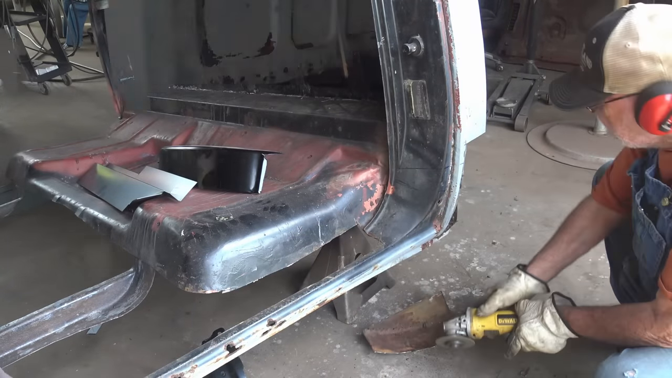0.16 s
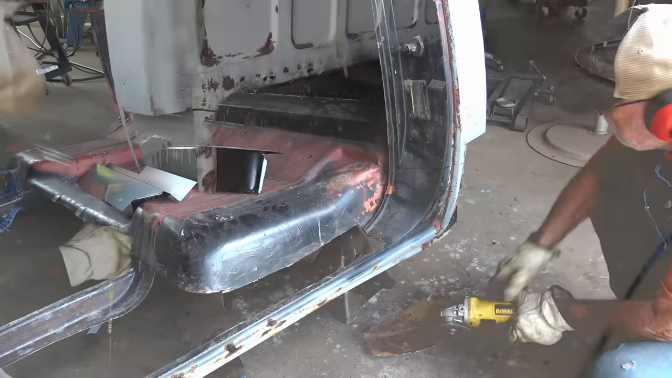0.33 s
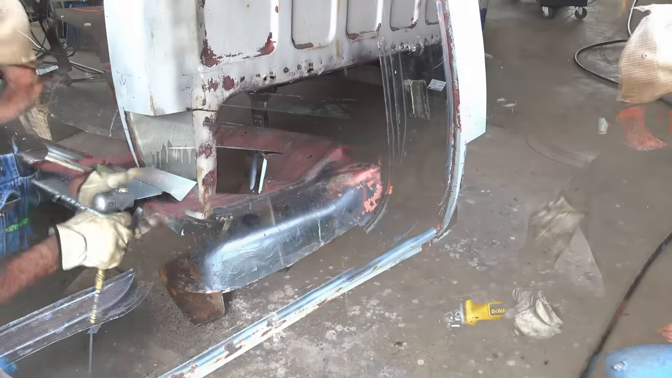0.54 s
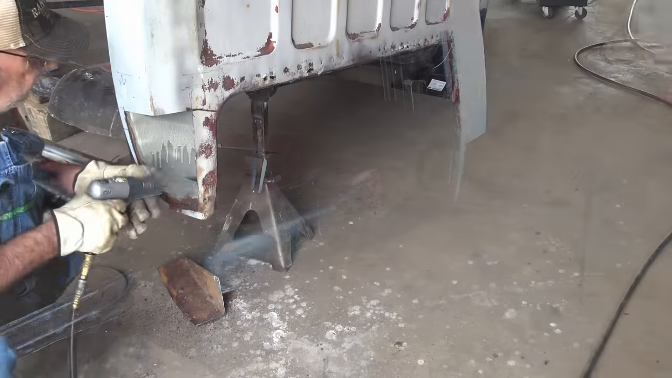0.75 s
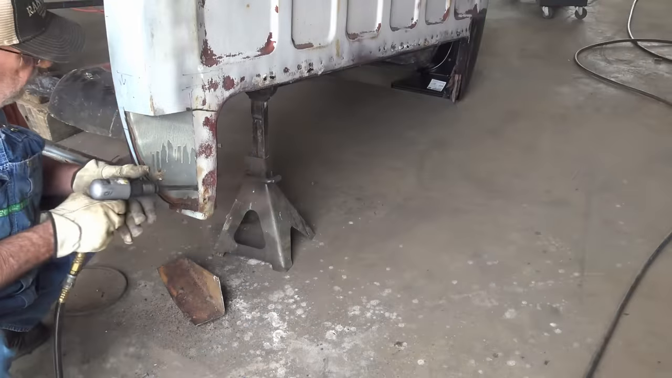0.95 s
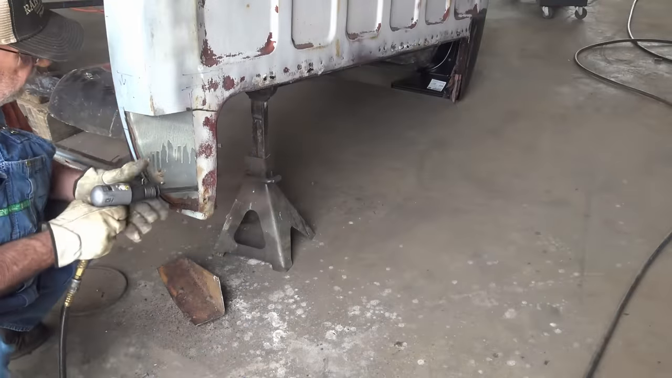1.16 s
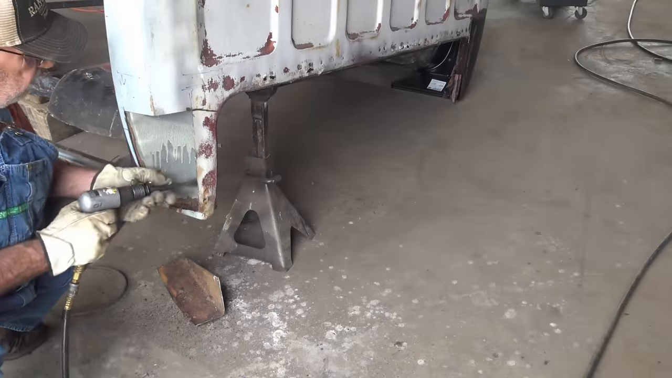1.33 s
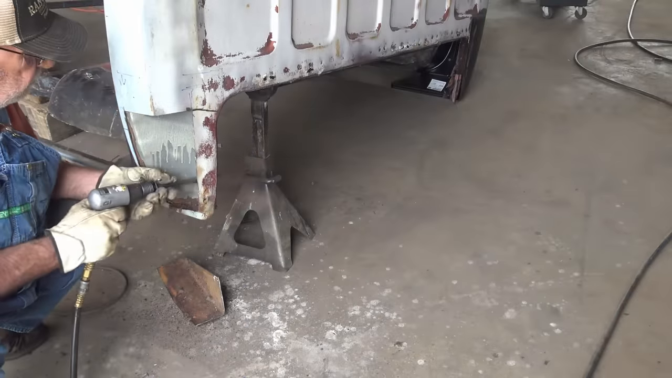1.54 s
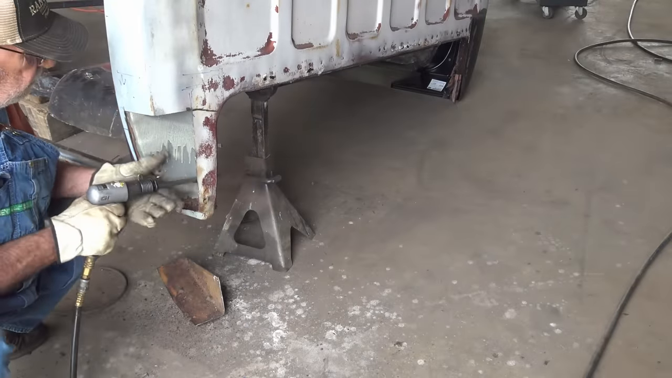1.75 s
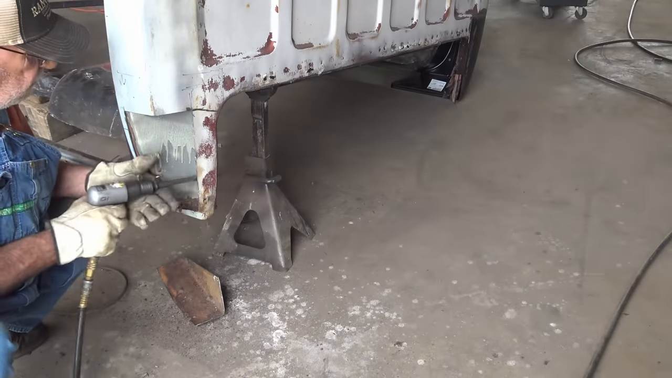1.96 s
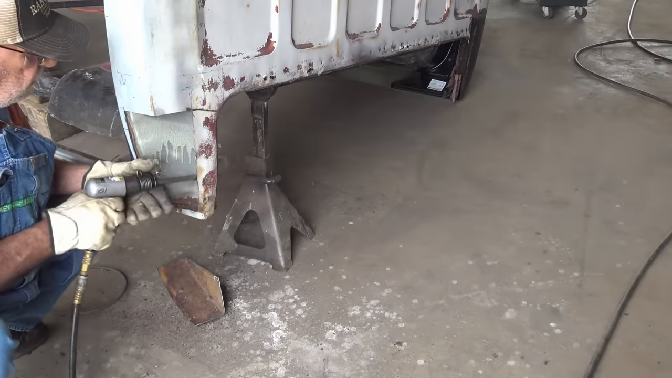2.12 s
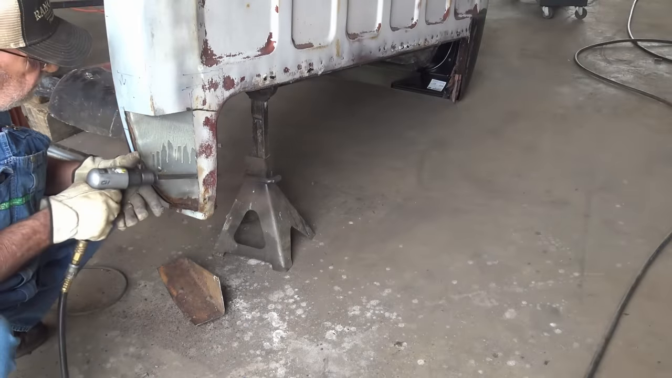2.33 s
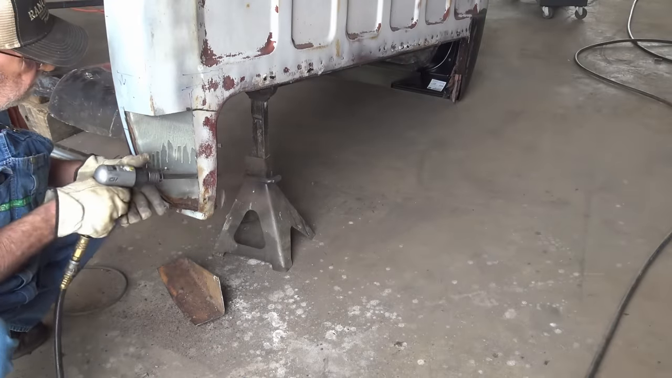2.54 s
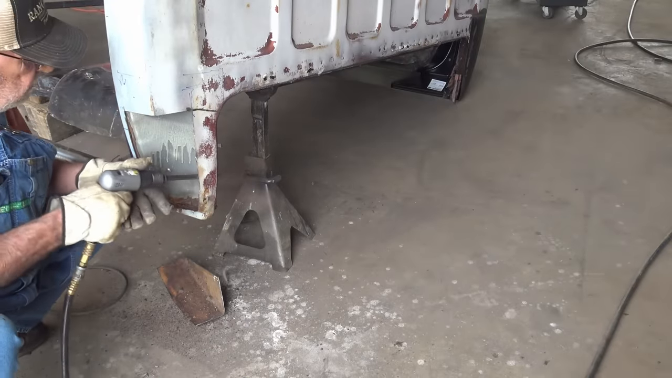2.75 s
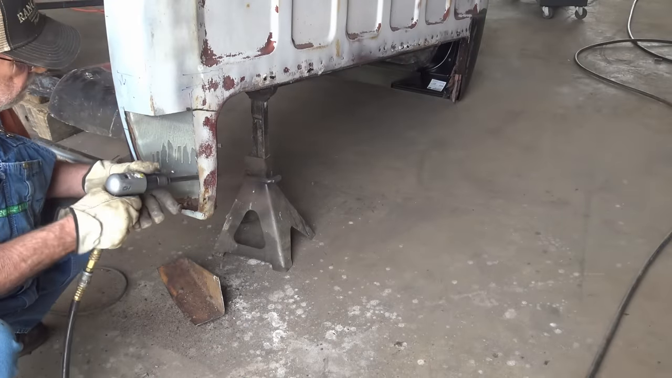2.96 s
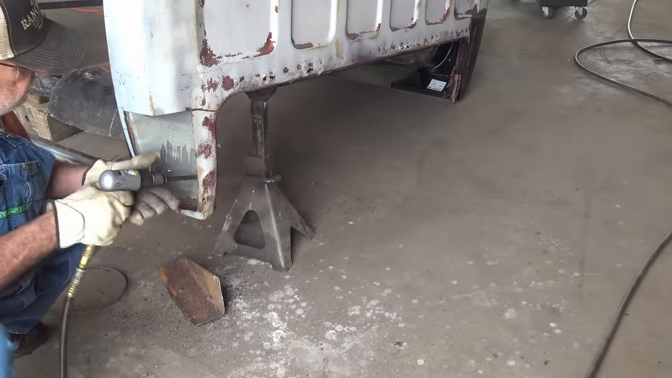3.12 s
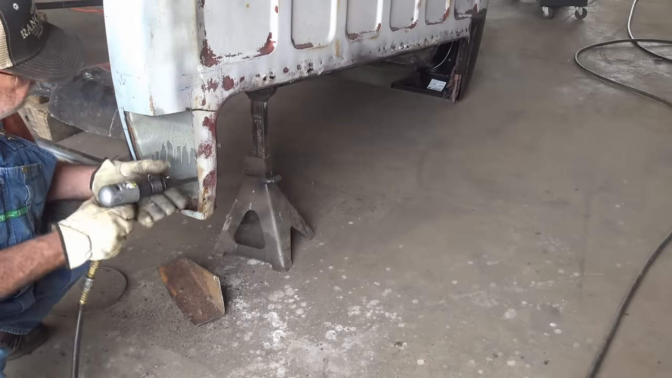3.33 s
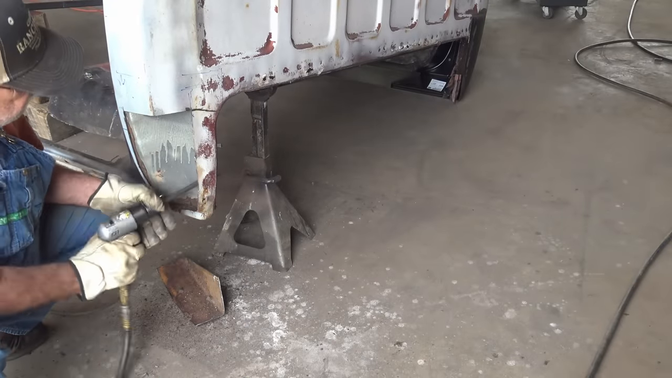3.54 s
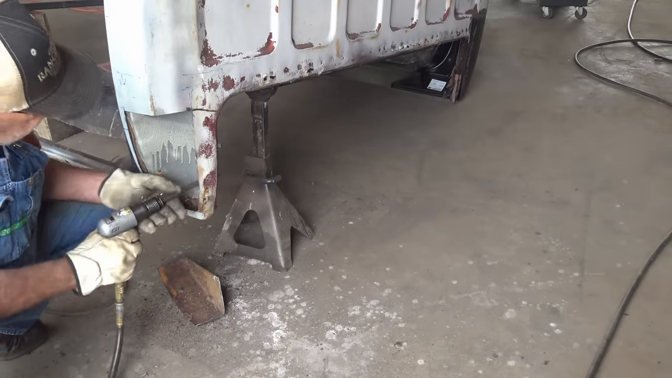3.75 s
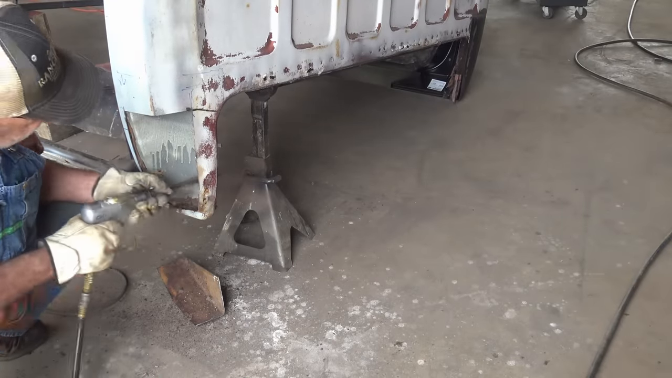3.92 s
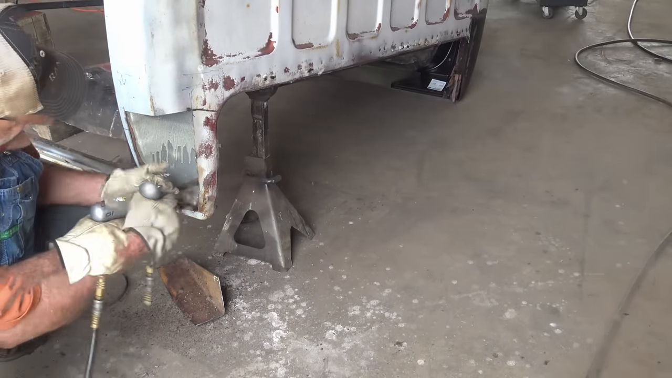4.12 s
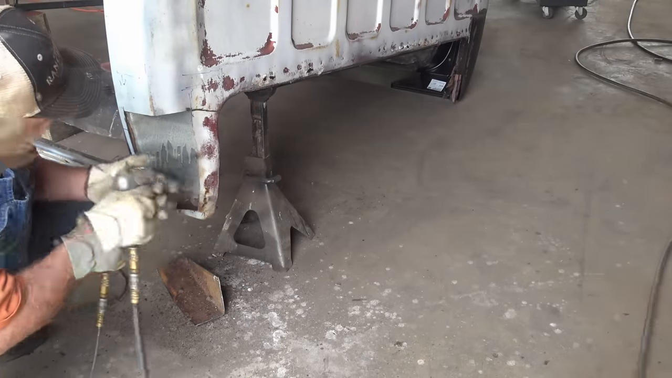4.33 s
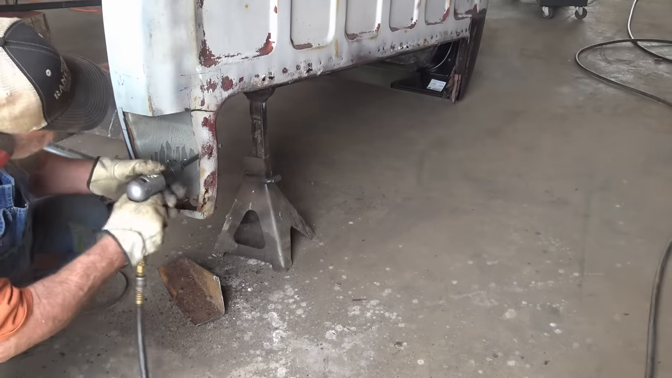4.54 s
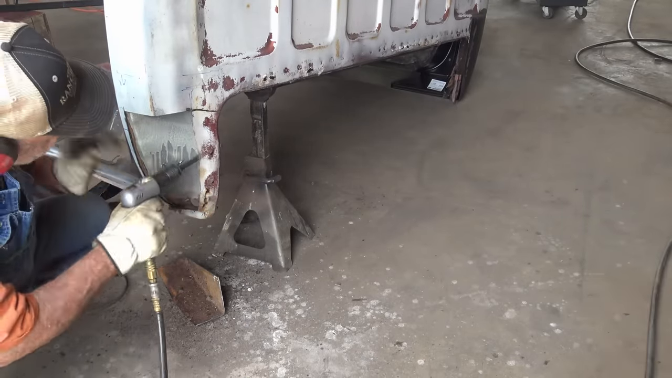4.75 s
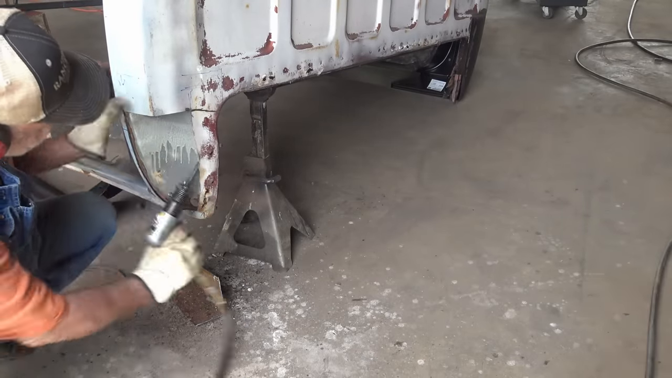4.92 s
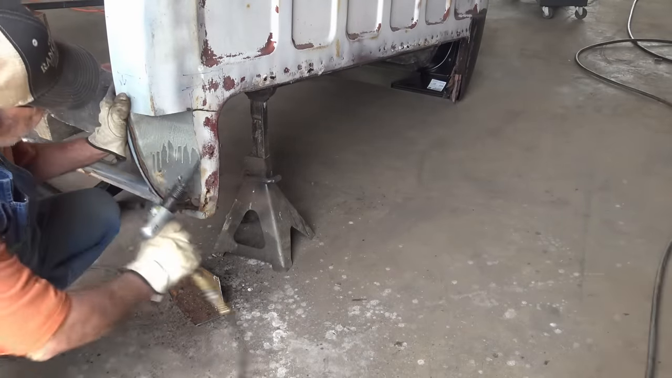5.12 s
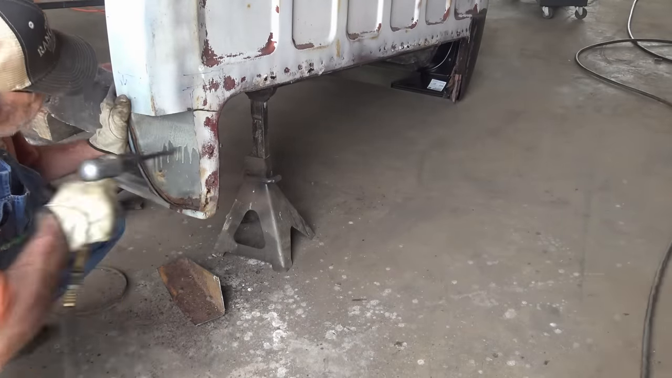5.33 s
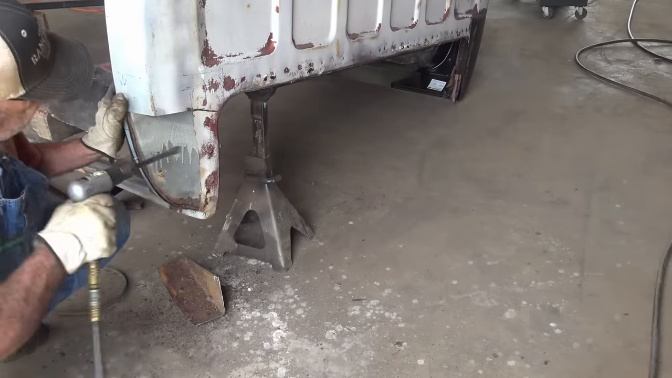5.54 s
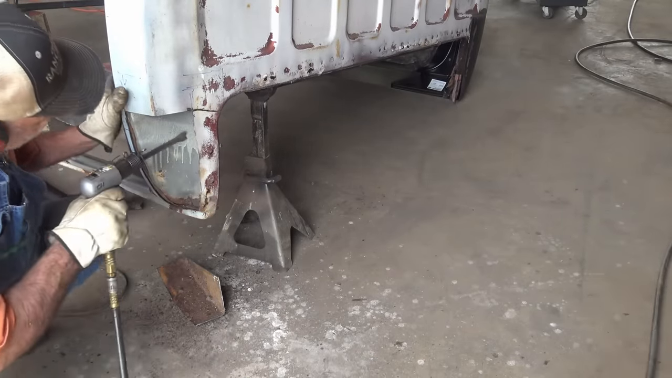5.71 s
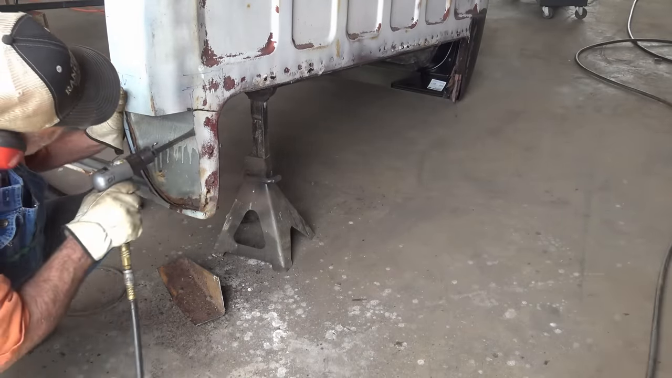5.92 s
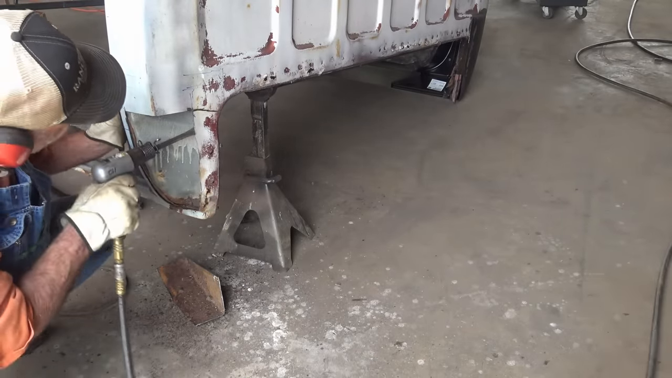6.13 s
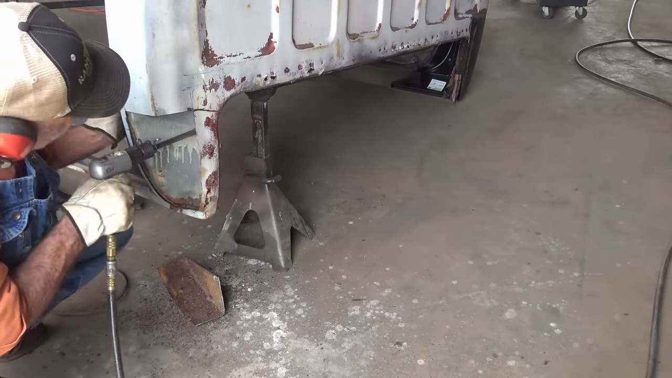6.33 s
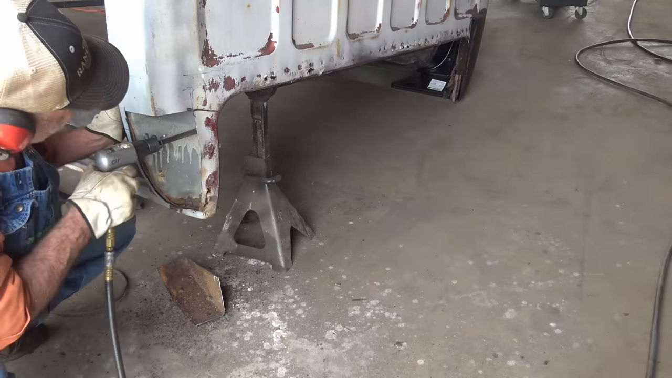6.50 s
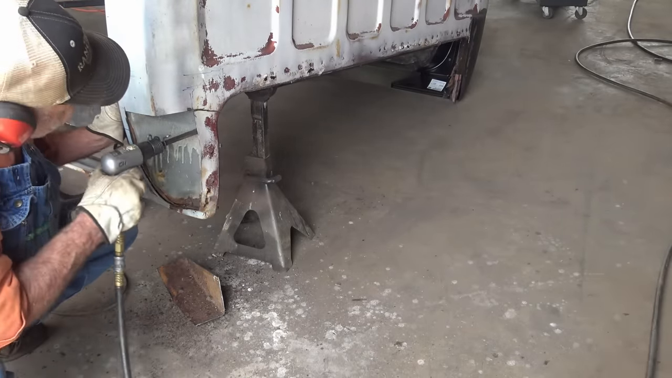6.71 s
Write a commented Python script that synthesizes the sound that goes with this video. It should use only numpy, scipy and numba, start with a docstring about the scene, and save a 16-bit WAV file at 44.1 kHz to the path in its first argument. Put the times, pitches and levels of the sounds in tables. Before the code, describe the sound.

Close up in a workshop, a faint grinder runs down with a soft wooden bump, then compressed air spurts and a pneumatic chisel fires rapid bursts of hard metallic blows, each leaving a hollow panel boom and short hall tail. Four come early; then the room quiets to hum, thin hiss and scattered light knocks on metal. A fifth burst, slightly softer, rattles near the end and decays.

```python
"""An air chisel hammers five bursts into a sheet-metal body, close to a stereo pair of microphones in a workshop.
Each blow is a noise crack on decaying modes of panel, bit, tip and barrel, with a puff of exhaust and a hall tail.
Before it a grinder (falling sines over noise) runs down and fades; bumps of the tool ring the hand-damped panel.
Behind lie leaking air and a compressor's hum, made of coloured noise and steady tones.
The recorder's limiter holds the bursts down, so the boom swells up again when the blows stop."""
import sys
import numpy as np
from scipy import signal
from scipy.fft import rfft, irfft
from scipy.io import wavfile
from scipy.ndimage import uniform_filter1d, minimum_filter1d
from numba import njit

SR = 44100
rng = np.random.default_rng(int(sys.argv[2]) if len(sys.argv) > 2 else 0)


def int16_out(signal):
    """Quantize to a 16-bit WAV file."""
    q = np.round(np.clip(np.atleast_2d(signal).T, -1, 1) * 32767)
    wavfile.write(sys.argv[1], SR, q.astype(np.int16))


def convert_level_to_amplitude(level_db):
    """Map a level in decibels to its linear amplitude factor."""
    exponent = np.asarray(level_db, float) / 20
    return 10 ** exponent


N = 302967
T = np.arange(N) / SR

# Shop air: spectrum of the leak, before scaling to rms 1: (frequency [Hz], density [dB per Hz])
HISS_SPECTRUM = [(290, -10.5), (500, -6.5), (619, -3), (829, -3), (922, -9), (1220, -4), (1870, -3.5),
                 (3930, 0.5), (4920, -2), (6600, -0.5), (10500, -1), (13000, -4), (15600, -8.5)]
# level of the leaking air: (time [s], level [dB])
LEAK_LEVEL = [(.574, -32.5), (.81, -35), (1.36, -46), (1.546, -41.5), (1.8, -42), (2.24, -50.5),
              (3.42, -52.5), (3.534, -50), (4.24, -49.5), (4.25, -55), (4.71, -55.5), (4.8, -51),
              (4.98, -46), (5.06, -50.5), (5.27, -52), (5.31, -46), (6.3, -40.5), (6.8, -54)]
# valve opening ahead of a burst, and loose spurts of air: (time [s], peak level [dB], length [s])
AIR_SPURTS = [(0.807, -10, 0.044), (1.805, -18, 0.013), (2.276, -31.5, 0.0096), (2.686, -30, 0.018),
              (6.309, -18, 0.018), (4.915, -44.5, 0.018), (4.982, -41.5, 0.039)]
# spectrum of the shop's hum, before scaling to rms 1: (frequency [Hz], density [dB per Hz])
HUM_SPECTRUM = [(15, -35), (25, -29), (48, -9.5), (95, -6), (140, 1), (190, 1.5), (260, -4), (330, -3.5),
                (395, -7.5), (425, 0.5), (470, -7), (650, -12), (1500, -15), (2500, -68)]
# level of the hum with its tones: (time [s], level [dB])
HUM_LEVEL = [(.57, -61.5), (1.7, -58), (3.3, -55.5), (3.6, -56), (4.24, -53.5), (4.25, -60), (5.25, -56.5),
             (5.4, -56), (6.3, -53.5), (6.8, -59)]
# compressor tones: (multiple of the turning rate, level against the hum [dB])
COMPRESSOR_TONES = [(2, -16), (6, -10), (7, -10), (8, -10), (9, -16), (12, -14), (13, -9), (15, -15),
                    (17, -9), (20, -16), (21, -16)]
COMPRESSOR_HZ = 23.13  # turning rate

# Grinder: spectrum of its motor noise, before scaling to rms 1: (frequency [Hz], density [dB per Hz])
GRINDER_SPECTRUM = [(40, -38), (100, -20), (300, -20), (450, -16), (540, -13), (640, -11.5), (950, -12),
                    (1280, -2), (1900, -6.5), (2900, -1.5), (5000, -9), (9000, -10.5), (15500, -25)]
# grinder laid on a block: (time [s], level [dB])
SET_DOWN = [(.012, -63), (.06, -55.5)]
# modes of the wooden block: (frequency [Hz], level [dB], t60 [s])
BLOCK_MODES = [(179, -11, .25), (455, -3, 0.29), (615, -3, 0.48), (722, -0.5, 0.31)]
WHINE_HZ, RUNDOWN_PER_S, FADE_END_S = 9330, .4, .57  # whine at the start, its rate of fall
WHINE_DB, MOTOR_DB = -59, -50.5
WHINE_PER_SHAFT, SHAFT_DB = 24.5, -17  # whine over shaft rate; shaft hum against the whine
GRINDER_SIDE_DB = -2  # the grinder is narrower
SCRAPE_S = .05  # it slides a moment on the wood

# Tool bumping the body: (time [s], level [dB], hardness [dB per octave], modes favoured by the spot [Hz])
KNOCKS = [(1.46, -54.5, -7.5, 278.2), (1.545, -52.5, -4, 474), (1.6, -52.5, 0, 400),
          (4.077, -57.5, 6, 1010), (4.088, -61.5, 9, 1240), (4.161, -53, 1, 560), (4.163, -51, 6, 1300),
          (4.171, -52, 0, 860), (4.187, -55, 2, 398), (4.206, -67, 8, 495), (4.215, -57.5, 1, 280),
          (4.221, -60, 2, 900), (4.234, -61, 3, 1300), (4.572, -58, 4.5, 352), (4.588, -61.5, 3, 300),
          (5.304, -56, 11, 1345), (5.322, -58, 3, 556), (5.35, -59.5, 11, 920), (5.375, -56, 12, 500),
          (5.397, -57.5, 9, 420), (5.44, -64, -5, 400), (5.729, -54.5, 9, 450), (5.731, -53.5, 11, 1345),
          (5.75, -61, 11, 2280), (5.762, -63, 10, 990), (5.785, -60, 3, 1300), (6.314, -37, 8, 1800)]
# crack of a bump: (frequency [Hz], gain [dB])
KNOCK_CRACK = [(150, -24), (400, -5), (1200, -2), (2500, 4), (5000, 5), (12000, -9)]
HELD = 0.59  # share of its ring time that the panel keeps under the hand
KNOCK_SPOT_DB, KNOCK_SPOT_OCTAVES = 11, 0.17  # lift and width of the favoured modes
CUT_S = 4.243  # a cut here chops off the stand's direct ring and the tails of the earlier knocks

# Trigger pulls: (first blow [s], last blow [s], force [dB], freedom of the bit to ring [dB],
# force lost by the end [dB], modes favoured by the spot struck [Hz], stand level [dB], hardness [dB per octave])
BURSTS = [(0.8227, .962, -3.5, 18.5, 10, 266, -10, 2), (1.8151, 1.997, -4, 21, 18, 640, -5, 1),
          (2.2857, 2.475, -8.5, 8, 5.5, 464, 5, 2.5), (2.6976, 3.0193, -9.5, 7, 9.5, 605, -3.5, 2),
          (6.323, 6.524, -18, 17.5, 2, 436.6, -6, 3)]
# strokes that miss the bit and clack on the barrel: (time [s], clack level [dB])
CLACKS = [(0.8807, -3), (0.904, 6), (1.9147, 4), (1.982, -18), (1.992, -9), (2.3301, 4), (2.341, 0),
          (2.3499, 7), (2.3909, 5), (2.4173, -2), (2.457, -11), (2.7683, -4), (2.808, 6), (2.8336, -3),
          (2.859, 0), (2.8835, -5), (2.9086, -1), (2.9313, 2), (2.9406, 6), (2.9624, -3), (2.9883, 3),
          (3.0021, -20), (6.3139, 9), (6.4079, 5), (6.446, -3), (6.4711, 6), (6.496, 1.5)]
STROKE_S, REBOUND_S, JITTER_S = .0143, .0106, .0005  # piston cycle after a blow on the bit, after a clack
HIT_CLACK_DB, HIT_TICK_DB = -13, 5  # barrel and tip on a blow that meets the bit
MISS_TICK_DB, MISS_RING_DB = -21, -4  # tip and bit on a miss
SOFTENS_DB = 3  # per octave: contact hardness lost by the last blow as the bit sinks in
FIRST_BOOM_DB, FIRST_PUFF_DB = 4, 5  # first blow: panel at rest, exhaust vents full line pressure
# modes of the sheet-metal panel: (frequency [Hz], level [dB], t60 [s])
PANEL_MODES = [(124.3, -14.5, 2.3), (147.7, 3.5, 0.63), (166.1, -13, 1.36), (211.3, 1, 0.31),
               (256.8, -2.5, 0.4), (275.6, -0.5, 0.27), (354, 0, 0.39), (428, 7, 0.088), (432.4, 3.5, 0.13),
               (461, 3, 0.057), (550, 1.5, 0.065), (572.2, -7, 0.42), (620, 2.5, 0.076), (709, -6, 0.23),
               (845, -4.5, 0.12), (996, -2.5, 0.043), (1240, -6.5, 0.024), (1345, -14.5, 0.076),
               (1497, -4.5, 0.012), (1800, -7, 0.023), (2190, -19, 0.024), (2360, -20.5, 0.054),
               (2570, -16, 0.027)]
# modes of the steel bit: (frequency [Hz], level [dB], t60 [s])
BIT_MODES = [(4430, -22, .015), (7800, -14, .025), (8320, -13, .02), (12100, -15, .02), (13400, -11, .02),
             (14230, -6, .01), (14550, -3, .008), (14780, -1.5, .014), (15020, -2, .012), (15400, -3, .006)]
# modes of the bit's tip: (frequency [Hz], level [dB], t60 [s])
TIP_MODES = [(15100, 3, .004), (13800, -3, .003), (11000, -8, .002)]
# modes of the tool's barrel: (frequency [Hz], level [dB], t60 [s])
BARREL_MODES = [(8860, 3, .005), (9300, -1, .004), (7500, -6, .003)]
# steel stand, left ringing as each burst ends: (frequency [Hz], level [dB], t60 [s])
STAND_MODES = [(704.5, -48, 2.6), (708.5, -52, 2.6), (714, -54, 1.2)]
# crack of a blow: (frequency [Hz], gain [dB])
BLOW_CRACK = [(70, -49), (120, -11.5), (200, 10), (400, 13), (800, 7), (1600, 3.5), (3500, 1.5), (6000, -5),
              (9000, -10), (12000, -2.5), (15500, 2.5)]
# puff of exhaust after a blow: (frequency [Hz], gain [dB])
EXHAUST = [(1500, -8.5), (3500, 9), (7000, 15.5), (11000, 14), (15600, -23)]
PANEL_DB, BIT_DB, BARREL_DB, TIP_DB = -24.5, -14, 2.5, -5
CRACK_DB, CRACK_S, EXHAUST_DB, EXHAUST_S = -2, 0.0043, -15.5, 0.0045
SNAP_DB, SNAP_S = 3, 0.00042  # the sharp edge of each blow, against its crack
SPOT_DB, SPOT_OCTAVES = 4.5, 0.31  # lift and width of the favoured modes
FLEX, FLEX_PER_S = .25, 35  # the shaken panel flexes, which roughens its boom

# Hall: (frequency [Hz], t60 [s], level before the tail is scaled to unit energy [dB])
HALL_BANDS = [(114, 0.82, -2.5), (253, 1, -2), (520, 0.85, 4), (1040, 0.79, 4.5), (1940, 0.7, 3),
              (4200, 0.64, -1), (8450, 0.39, 1), (14300, 0.26, 0.5)]
HALL_DB, HALL_BUILD_S, HALL_SIDE_DB = -1.5, 0.0022, -3.5
# difference between the microphones: (frequency [Hz], side filter gain [dB])
SIDE_GAIN = [(30, -51), (60, -26), (125, -20.5), (250, -19), (500, -18.5), (1000, -25), (2200, -28.5),
             (4000, -30.5), (8000, -13), (15000, -15.5)]
SIDE_WALK_DB = 1.5  # small random changes of the side level
BLOW_PAN = 0.039  # share of the direct blows that leans left
LIMIT_DB, LIMIT_RATIO, RELEASE_S, AHEAD_S = -20.5, 8.76, 0.018, 0.0028
TOP_HZ = 15850


def colour(x, points):
    """Filter by (frequency [Hz], gain [dB]) points; causal, from the cepstrum of the log gain."""
    hz, db = np.transpose(points)
    grid = np.maximum(np.arange(2049) * SR / 4096, 1)
    log_gain = np.interp(np.log(grid), np.log(hz), db) * np.log(10) / 20
    cepstrum = irfft(log_gain)
    # folding the cepstrum forward gives minimum phase
    cepstrum[1:2048] *= 2
    cepstrum[2049:] = 0
    response = irfft(np.exp(rfft(cepstrum)))
    return signal.fftconvolve(x, response)[:len(x)]


def unit(x):
    """Scale to rms 1."""
    return x / np.sqrt(np.mean(x ** 2))


def walk(rate):
    """Random levels held 1 / rate s and slewed twice; spread a little under 1."""
    k = int(SR / rate)
    held = np.repeat(rng.standard_normal(N // k + 1), k)
    return uniform_filter1d(uniform_filter1d(held, k), k)[:N]


def ring(modes, times, db, scatter_db, tilt_db=0, rattle_s=0, spot=(500, 0, 1)):
    """Strike decaying modes; each blow meets each mode with its own strength, and may chatter on briefly.

    spot: (centre [Hz], lift [dB], width [octaves]) of the modes favoured by the spot struck."""
    out = np.zeros(N)
    at = (np.asarray(times) * SR).astype(int)
    chance = rng.standard_normal((len(at), len(modes)))
    spot_hz, spot_lift_db, spot_octaves = spot
    for k, (hz, mode_db, t60) in enumerate(modes):
        # a harder contact drives the upper modes more: tilt per octave
        hardness_db = tilt_db * np.log2(hz / 500)
        spot_db = spot_lift_db * np.exp(-(np.log2(hz / spot_hz) / spot_octaves) ** 2)
        hits = np.zeros(N)
        hits[at] = (-1) ** k * convert_level_to_amplitude(db + mode_db + scatter_db * chance[:, k] + hardness_db + spot_db)
        if rattle_s:
            fall = np.exp(-1 / (rattle_s * SR))
            hits = signal.lfilter([np.sqrt(1 - fall ** 2)], [1, -fall], hits) * rng.standard_normal(N)
        r = np.exp(-np.log(1000) / (t60 * SR))
        w = 2 * np.pi * hz / SR
        out += signal.lfilter([0, np.sin(w)], [1, -2 * r * np.cos(w), r * r], hits)
    return out


def crack(times, db, fade_s, points):
    """A short decaying burst of coloured noise at each time."""
    hits = np.zeros(N)
    hits[(times * SR).astype(int)] = convert_level_to_amplitude(db)
    burst = signal.lfilter([1], [1, -np.exp(-1 / (fade_s * SR))], hits)
    return colour(burst * rng.standard_normal(N), points)


@njit
def follow(x, fall):
    """Peak follower: jumps up at once, sinks slowly."""
    y, e = np.empty(len(x)), 1e-9
    for i in range(len(x)):
        e = max(x[i], e * fall)
        y[i] = e
    return y


def hall(x):
    """Diffuse tail as mid and side: noise that builds up, then dies at each band's own rate."""
    t = T[:int(1.5 * SR)]
    tails = []
    for _ in range(2):
        noise, tail = rfft(rng.standard_normal(len(t))), 0
        log_hz = np.log(np.maximum(np.arange(len(noise)) * SR / len(t), 1))
        centres = np.log(np.array(HALL_BANDS)[:, 0])
        for k, (hz, t60, db) in enumerate(HALL_BANDS):
            share = np.interp(log_hz, centres, np.arange(len(HALL_BANDS)) == k)
            band = irfft(noise * share, len(t))
            tail = tail + convert_level_to_amplitude(db) * band * np.exp(-np.log(1000) * t / t60)
        tail = tail * (1 - np.exp(-t / HALL_BUILD_S))
        tails.append(signal.fftconvolve(x, tail / np.sqrt(np.sum(tail ** 2)))[:N])
    return convert_level_to_amplitude(HALL_DB) * np.array(tails)


def shop_air():
    """Turbulent hiss of leaking air with spurts, and the shop's low hum with compressor tones; mid and side."""
    hiss_db = np.interp(T, *np.transpose(LEAK_LEVEL))
    hum_db = np.interp(T, *np.transpose(HUM_LEVEL))
    # each spurt swells and falls as half a sine
    spurt = sum(convert_level_to_amplitude(db) * np.sin(np.pi * np.clip((T - t) / length, 0, 1)) for t, db, length in AIR_SPURTS)
    turn = 2 * np.pi * COMPRESSOR_HZ * np.cumsum(1 + .002 * walk(2)) / SR
    out = []
    for _ in range(2):
        hiss = unit(colour(rng.standard_normal(N), HISS_SPECTRUM))
        hum = unit(colour(rng.standard_normal(N), HUM_SPECTRUM))
        for multiple, db in COMPRESSOR_TONES:
            level = np.sqrt(2) * convert_level_to_amplitude(db + 1.1 * walk(4.55))
            hum = hum + level * np.sin(multiple * turn + 2 * np.pi * rng.random())
        flow = np.hypot(convert_level_to_amplitude(hiss_db + walk(29)), spurt)
        out.append(flow * hiss + convert_level_to_amplitude(hum_db + 0.94 * walk(10)) * hum)
    return (T > LEAK_LEVEL[0][0]) * np.array(out)


def grinder():
    """Falling gear whine and shaft hum over motor noise, and a thud on a block, all fading to silence."""
    fade = np.clip(1 - T / FADE_END_S, 0, 1)
    hz = WHINE_HZ * np.exp(-RUNDOWN_PER_S * T)
    turn = 2 * np.pi * np.cumsum(hz * (1 + .0015 * walk(150))) / SR
    tones = np.sin(turn) + convert_level_to_amplitude(SHAFT_DB) * np.sin(turn / WHINE_PER_SHAFT)
    whine = np.sqrt(2) * convert_level_to_amplitude(WHINE_DB + 2 * walk(60)) * tones
    motor = np.array([convert_level_to_amplitude(MOTOR_DB + walk(30)) * unit(colour(rng.standard_normal(N), GRINDER_SPECTRUM))
                      for _ in range(2)])
    thud = ring(BLOCK_MODES, *np.transpose(SET_DOWN), scatter_db=1, rattle_s=SCRAPE_S)
    thud = colour(thud, [(80, -24), (170, 0)])  # a small block gives no deep bass
    return fade * ([[1], [convert_level_to_amplitude(GRINDER_SIDE_DB)]] * motor + [[1], [0]] * (whine + thud))


def knocks():
    """Bumps on the same panel, its modes shortened by the hand, with hall; the cut chops off earlier tails."""
    s, db, tilt_db, spot_hz = np.transpose(KNOCKS)
    held_modes = np.array(PANEL_MODES) * [1, 1, HELD]
    # light bumps do not move the whole panel
    bass_cut = signal.butter(2, 220, "high", fs=SR, output="sos")
    out = 0
    for part, heard in ((s < CUT_S, T < CUT_S), (s > CUT_S, 1)):
        direct = ring(held_modes, s[part], db[part], scatter_db=3.5, tilt_db=tilt_db[part],
                      spot=(spot_hz[part], KNOCK_SPOT_DB, KNOCK_SPOT_OCTAVES))
        direct = direct + crack(s[part], db[part] + 6, CRACK_S, KNOCK_CRACK)
        direct = signal.sosfilt(bass_cut, direct)
        out = out + heard * (hall(direct) + [[1], [0]] * direct)
    return out


def strokes():
    """Piston timing: even blows on the bit fill the gaps between clacks, and force sags over each burst.

    Rows: time [s], clack, tick, force, ring, boom [dB], hardness [dB per octave], spot [Hz]."""
    rows = []
    for first, last, force_db, free_db, sag_db, spot_hz, _, hard_db in BURSTS:
        misses = [(s, db, MISS_TICK_DB, MISS_RING_DB) for s, db in CLACKS if first - REBOUND_S < s < last]
        gap_starts = [first] + [miss[0] + REBOUND_S for miss in misses]
        gap_ends = [miss[0] for miss in misses] + [last + STROKE_S]
        hits = []
        for a, b in zip(gap_starts, gap_ends):
            count = max(round((b - a) / STROKE_S), 0)
            hits += [(a + (b - a) * k / count, HIT_CLACK_DB, HIT_TICK_DB, 0) for k in range(count)]
        for k, (s, clack_db, tick_db, ring_db) in enumerate(sorted(misses + hits)):
            done = (s - first) / (last - first)
            rows.append((s, clack_db, tick_db, force_db - sag_db * done, free_db + ring_db,
                         FIRST_BOOM_DB * (k == 0), hard_db - SOFTENS_DB * done, spot_hz))
    rows = np.array(rows)
    chance = rng.standard_normal((len(rows), 2))
    rows[:, 0] += JITTER_S * chance[:, 0] * (rows[:, 2] != MISS_TICK_DB)  # only blows on the bit jitter
    rows[:, 2] += 2 * chance[:, 1]
    return rows.T


def chisel():
    """Each blow: crack, panel boom, tick at the tip, rough ring of the bit, barrel clack, exhaust; then the stand."""
    s, clack_db, tick_db, force_db, free_db, boom_db, tilt_db, spot_hz = strokes()
    first_blow = boom_db != 0
    boom = ring(PANEL_MODES, s, force_db + boom_db + PANEL_DB, scatter_db=4, tilt_db=tilt_db,
                spot=(spot_hz, SPOT_DB, SPOT_OCTAVES))
    boom = boom * (1 + FLEX * walk(FLEX_PER_S))
    # a small panel radiates little below its lowest mode
    boom = signal.sosfilt(signal.butter(3, 100, "high", fs=SR, output="sos"), boom)
    loose = 1 + .8 * walk(300)  # the bit shakes in its holder, which roughens its ring
    bit = loose * ring(BIT_MODES, s, force_db + free_db + BIT_DB, scatter_db=2.5, rattle_s=.005)
    tip = ring(TIP_MODES, s, force_db + tick_db + TIP_DB, scatter_db=1)
    barrel = ring(BARREL_MODES, s, force_db + clack_db + BARREL_DB, scatter_db=1)
    burst_end, stand_db = np.transpose(BURSTS)[[1, 6]]
    stand = (T < CUT_S) * ring(STAND_MODES, burst_end, stand_db, scatter_db=1)
    cracks = crack(s, force_db + boom_db + tilt_db / 2 + CRACK_DB, CRACK_S, BLOW_CRACK)
    snap = crack(s, force_db + boom_db + CRACK_DB + SNAP_DB, SNAP_S, BLOW_CRACK)
    exhaust = crack(s, force_db + EXHAUST_DB + FIRST_PUFF_DB * first_blow, EXHAUST_S, EXHAUST)
    return boom + bit + tip + barrel + stand + cracks + snap + exhaust


def scene():
    """Left and right from mid and side; the two close microphones differ mostly in the treble."""
    blows = chisel()
    background = shop_air() + grinder() + knocks()
    mid, side = background + [[1], [convert_level_to_amplitude(HALL_SIDE_DB)]] * hall(blows) + [[1], [0]] * blows
    side = convert_level_to_amplitude(SIDE_WALK_DB * walk(10)) * colour(side, SIDE_GAIN) + BLOW_PAN * blows
    return np.array([mid + side, mid - side])


def low_pass(x):
    """Removes everything above the highest recorded frequency."""
    return signal.sosfilt(signal.butter(12, 16830, fs=SR, output="sos"), x)


def record(dry):
    """A look-ahead limiter, keener on treble, ducks just before each blow and recovers after; the top is cut."""
    ahead = max(int(AHEAD_S * SR), 1)
    sensed = colour(dry.mean(axis=0), [(1000, 0.37), (12000, 0.84)])
    peak = follow(np.abs(sensed), np.exp(-1 / (RELEASE_S * SR)))
    gain = np.minimum(1, convert_level_to_amplitude(LIMIT_DB) / peak) ** (1 - 1 / LIMIT_RATIO)
    gain = uniform_filter1d(minimum_filter1d(gain, 2 * ahead + 1), ahead)
    top_cut = signal.ellip(8, .2, 60, TOP_HZ, fs=SR, output="sos")
    mix = signal.sosfilt(top_cut, dry * gain)
    return low_pass(mix)


dry = scene()
out = record(dry)
int16_out(out)
```